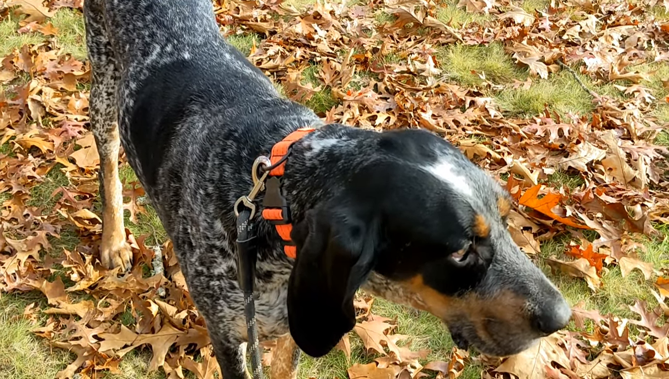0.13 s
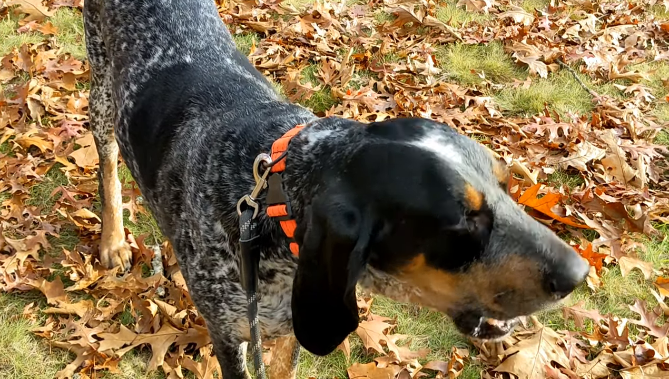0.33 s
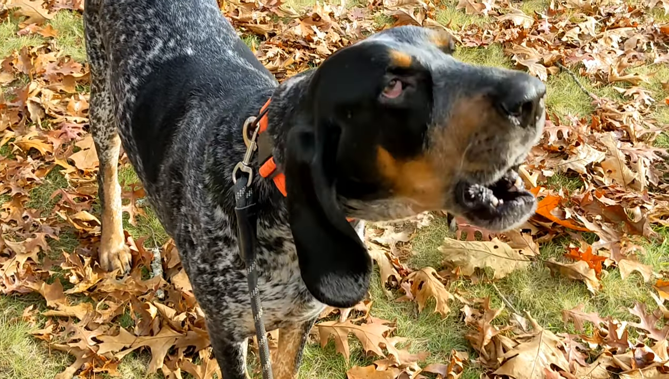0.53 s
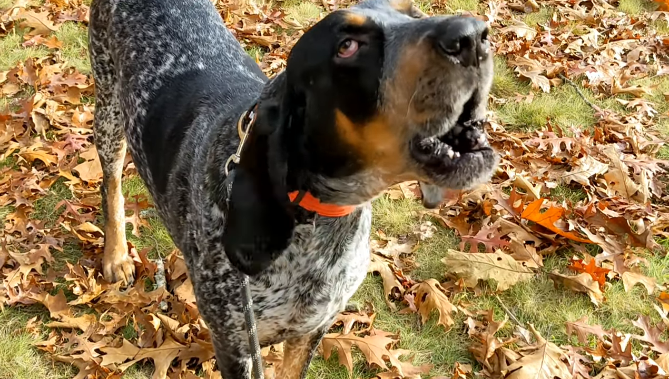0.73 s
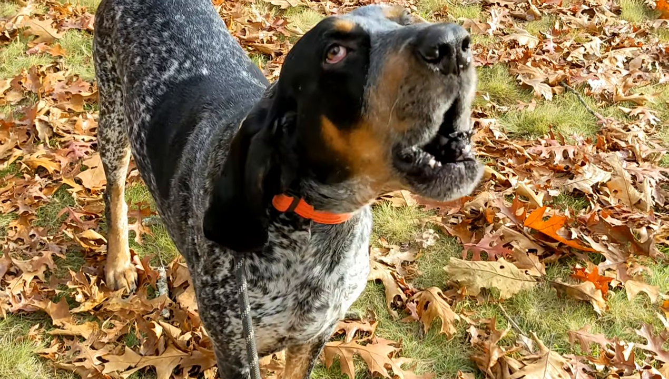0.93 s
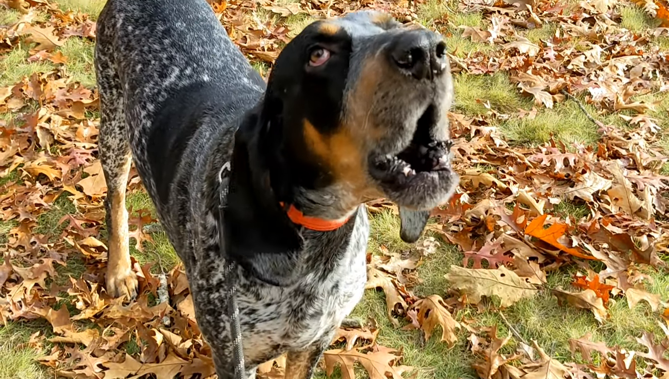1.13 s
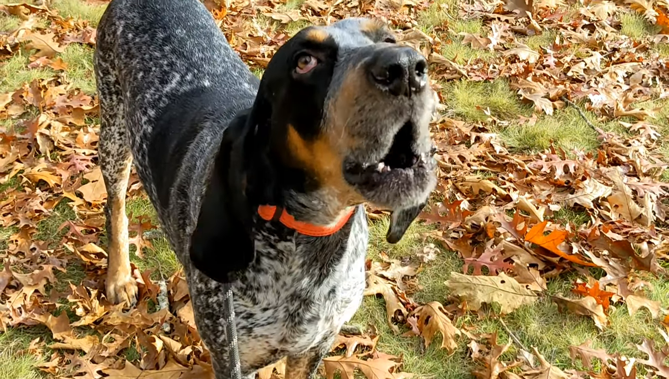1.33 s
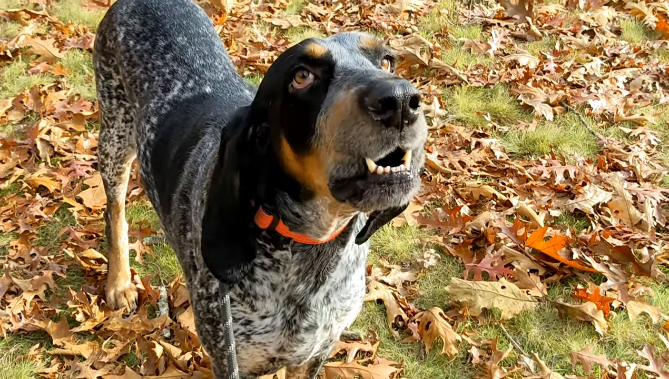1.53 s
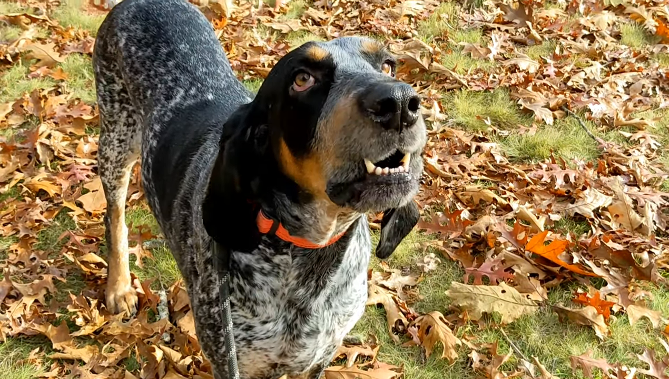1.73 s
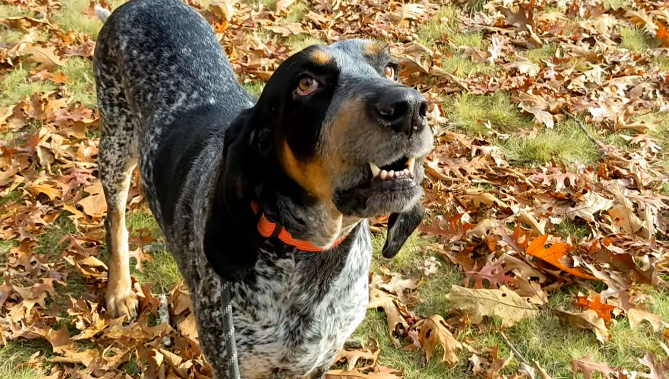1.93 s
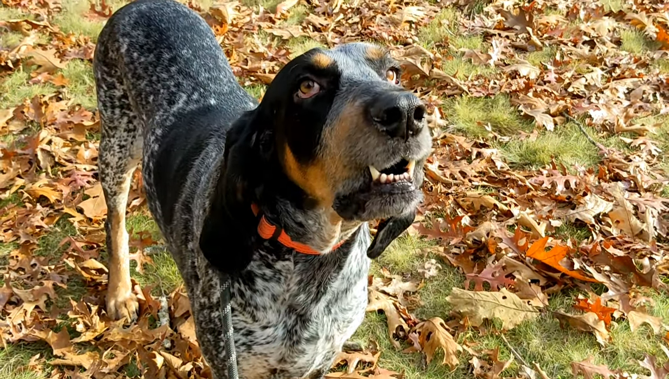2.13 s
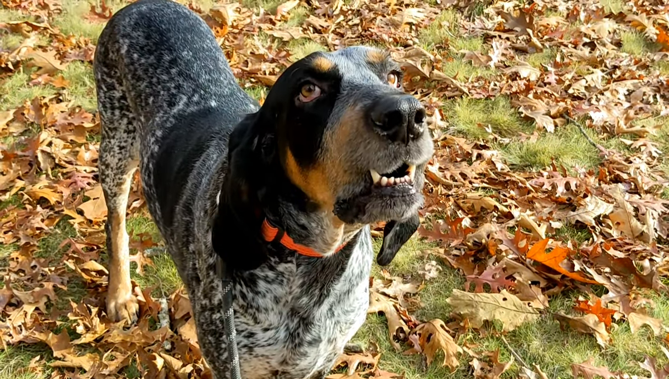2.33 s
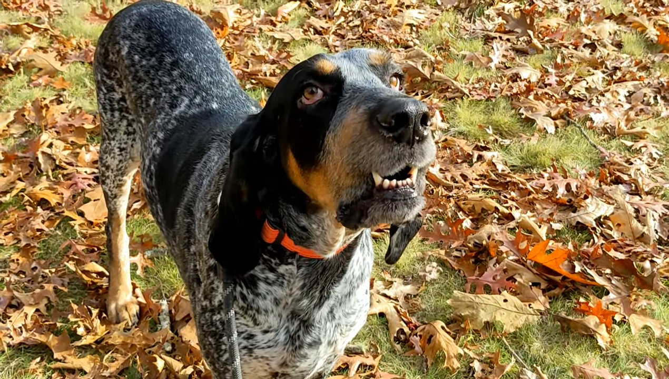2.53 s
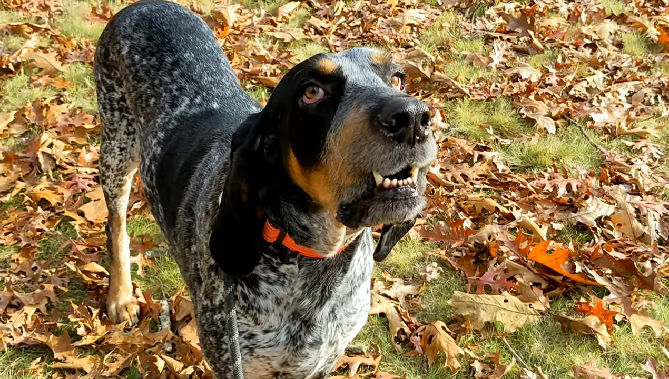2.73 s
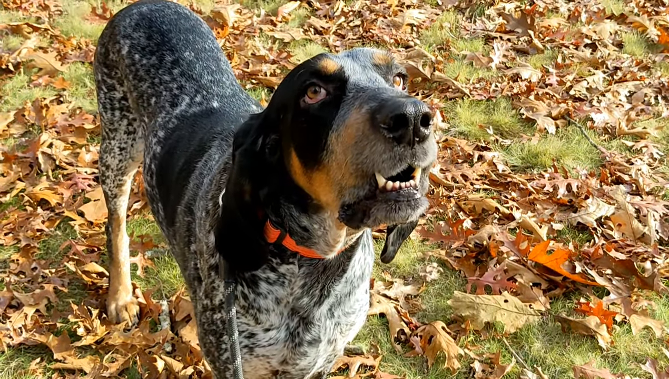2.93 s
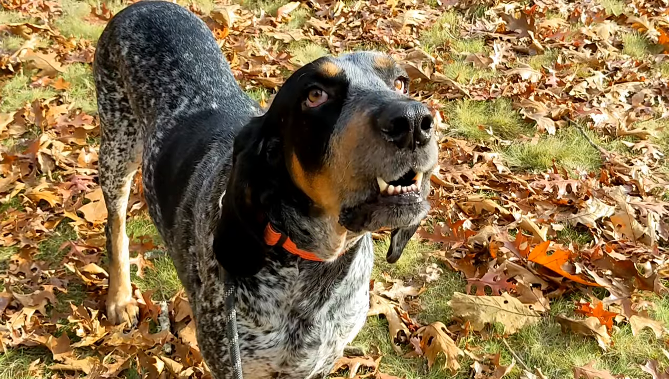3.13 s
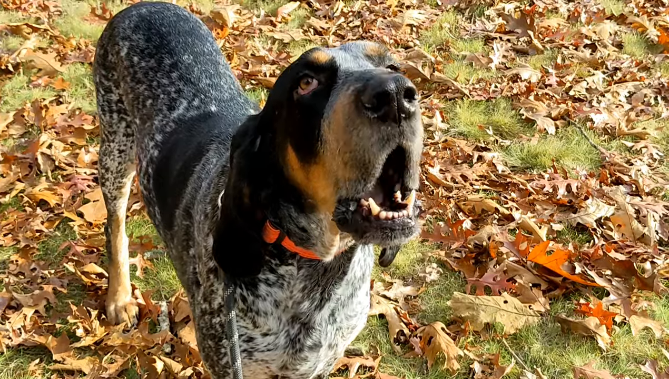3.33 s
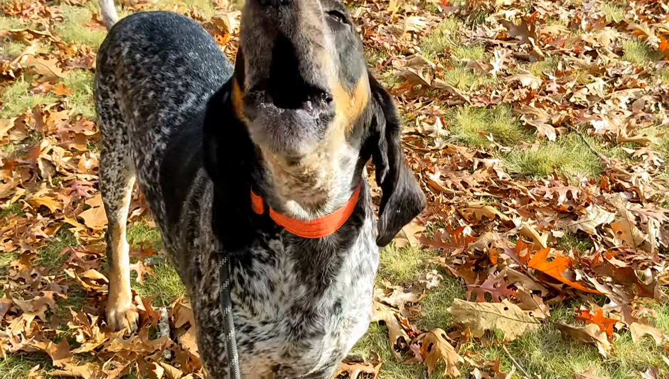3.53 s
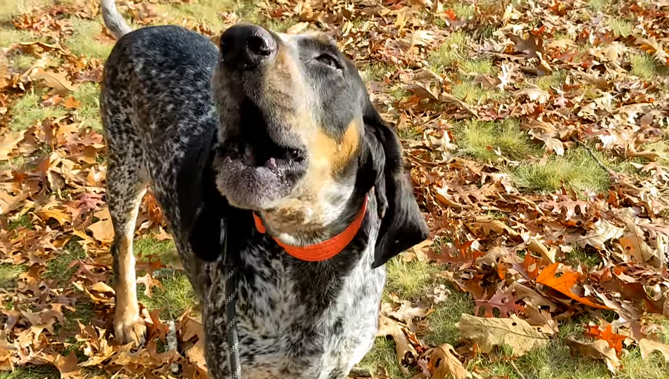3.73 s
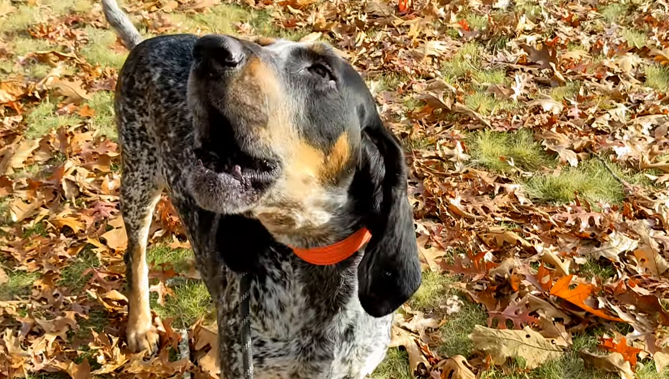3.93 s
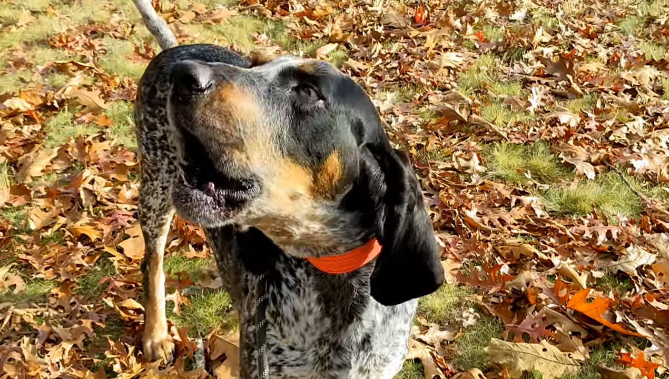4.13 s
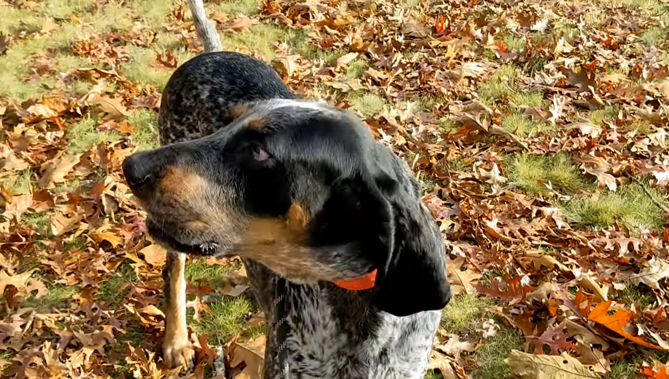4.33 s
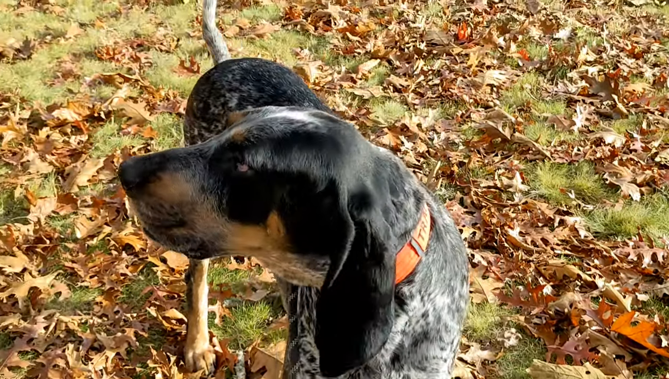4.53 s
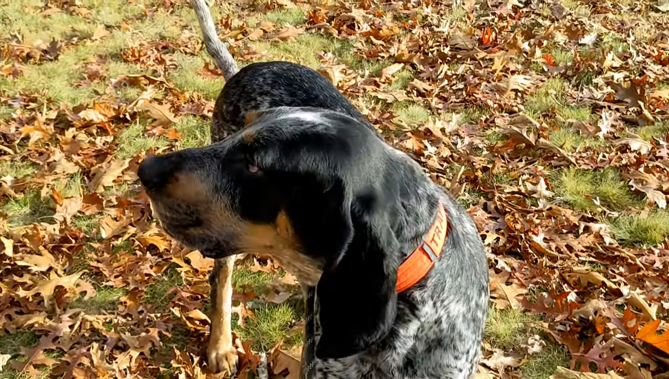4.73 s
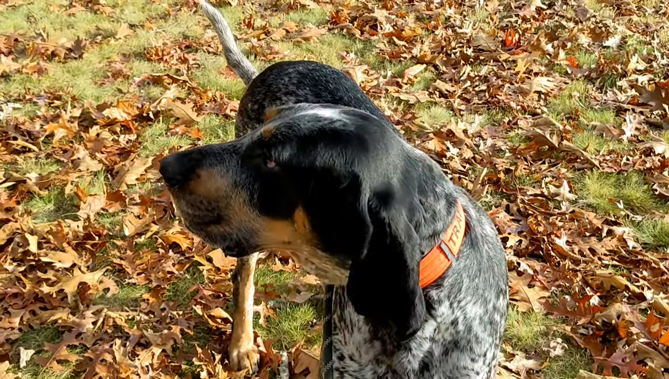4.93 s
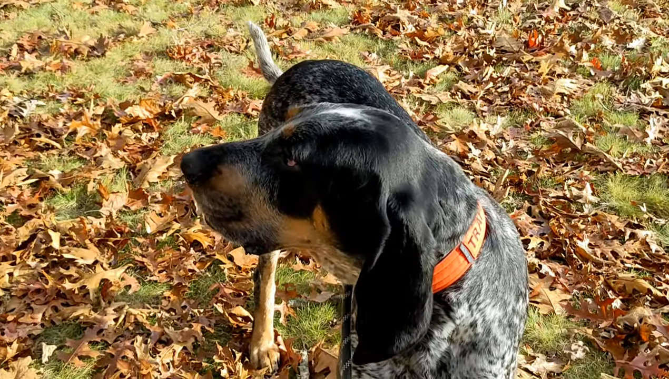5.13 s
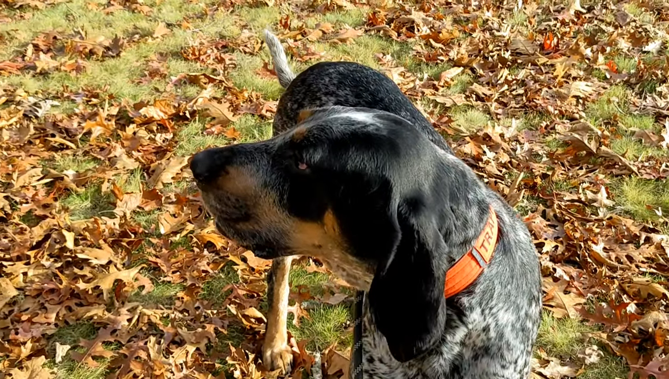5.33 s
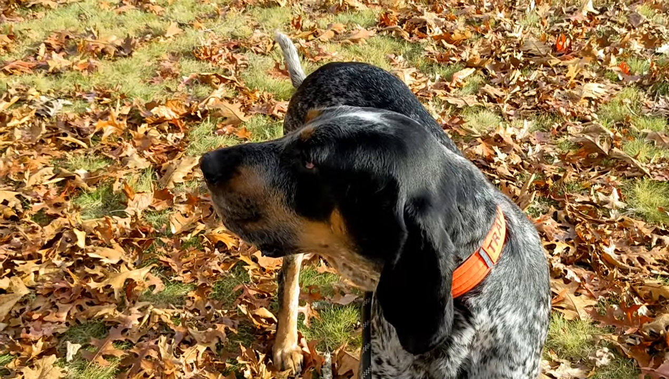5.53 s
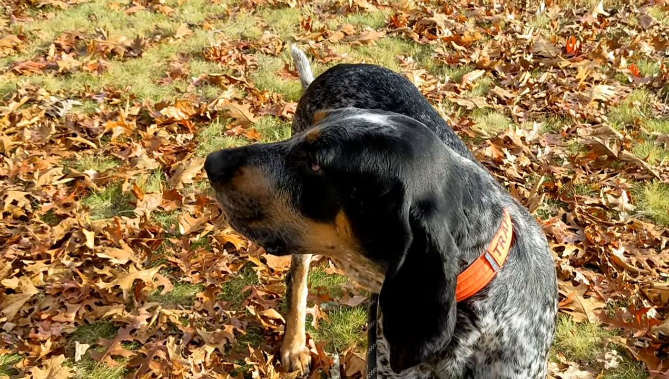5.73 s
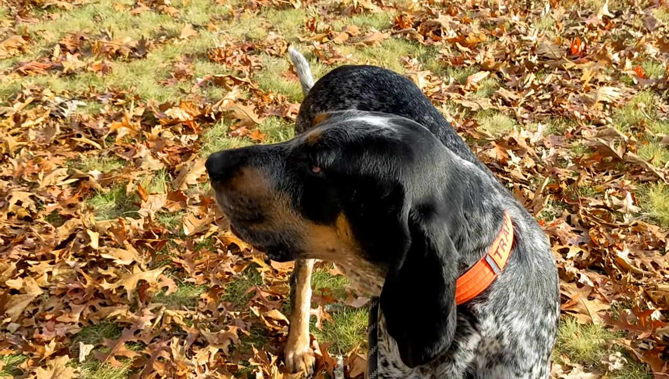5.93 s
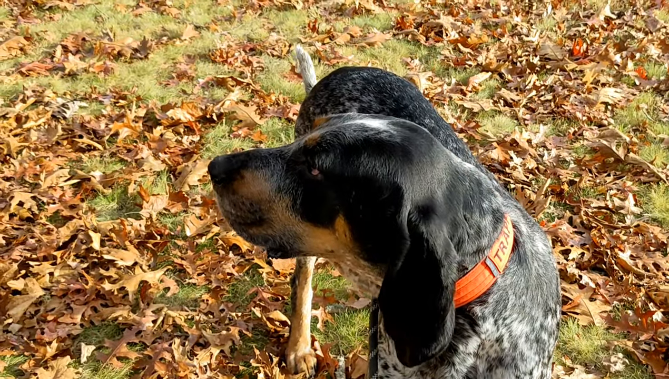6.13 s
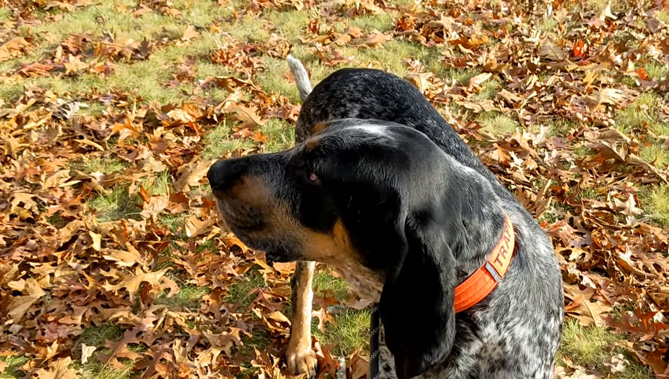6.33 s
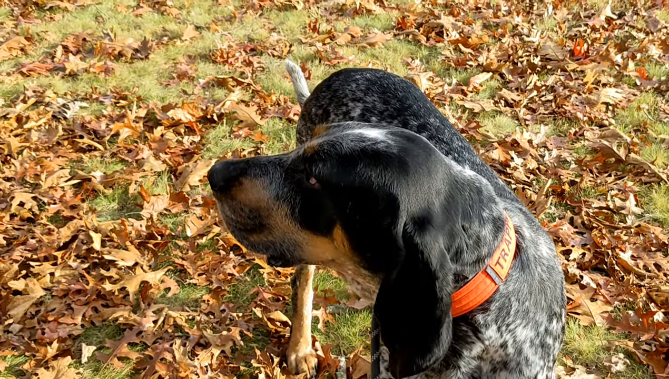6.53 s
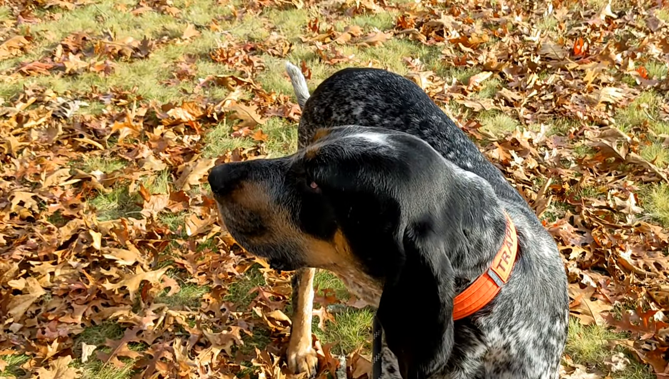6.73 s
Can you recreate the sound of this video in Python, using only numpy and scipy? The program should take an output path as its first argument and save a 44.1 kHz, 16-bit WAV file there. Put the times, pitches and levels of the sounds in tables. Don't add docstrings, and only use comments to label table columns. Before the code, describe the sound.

Two loud, throaty hound bays, each cracking up at the end, separated by faint high whines in a hushed outdoor yard.

```python
import sys
import numpy as np
from scipy import signal
from scipy.fft import rfft, irfft, next_fast_len
from scipy.io import wavfile
from scipy.ndimage import uniform_filter1d, map_coordinates

SR = 44100
rng = np.random.default_rng(int(sys.argv[2]) if len(sys.argv) > 2 else 0)


def waveform_to_disk(signal):
    frames = np.transpose(np.atleast_2d(signal))
    scaled = np.clip(frames, -1, 1) * 32767
    samples = np.round(scaled).astype(np.int16)
    wavfile.write(sys.argv[1], SR, samples)


def gain_from_db(level_db):
    decades = np.asarray(level_db, float) / 20
    return 10 ** decades


N = 299871


def along(points, hz):
    f, v = np.transpose(points)
    return np.interp(np.log(hz + 1), np.log(f + 1), v)


def unit(x):
    return x / np.sqrt(np.mean(x ** 2) + 1e-20)


def wobble(rate_hz, n):
    knots = rng.standard_normal(int(n * rate_hz / SR) + 4)
    return map_coordinates(knots, [np.arange(n) * rate_hz / SR])


def swells(rows):
    t = np.arange(N) / SR
    return sum(db * np.exp(-((t - s) / half_s) ** 2) for s, half_s, db in rows)


def span(rows, fade_s):
    s, *cols = np.transpose(rows)
    t = np.arange(max(round(s[0] * SR), 0), round(s[-1] * SR)) / SR
    window = np.clip(np.minimum(t - s[0] + (s[0] <= 0), s[-1] - t) / fade_s, 0, 1)
    return round(t[0] * SR), window, [np.interp(t, s, c) for c in cols]


def filtered(x, response):
    m = next_fast_len(x.shape[-1] + 8192)
    return irfft(rfft(x, m) * response(np.fft.rfftfreq(m, 1 / SR)), m)[..., :x.shape[-1]]


def resonance(hz, centre_hz, width_hz):
    return -10 * np.log10((1 - (hz / centre_hz) ** 2) ** 2 + (hz * width_hz / centre_hz ** 2) ** 2)


def ports(x, lean, lag_ms):
    side = np.array([[.5], [-.5]])

    def pair(hz):
        return gain_from_db(side * along(lean, hz)) * np.exp(-2j * np.pi * hz * side * lag_ms / 1000)

    return filtered(x, lambda hz: pair(hz) / np.maximum(abs(pair(hz).mean(0)), .5))


def rush(spectrum, patchy_db):
    # hz, left_right_likeness (-1 to 1)
    alike = [(60, 0.96), (150, 0.94), (380, 0.83), (950, 0.01), (2380, -0.1), (5980, -0.023),
             (15000, -0.062)]
    z = signal.stft(rng.standard_normal((2, N + 512)), nperseg=512)[2]
    field = uniform_filter1d(rng.standard_normal(z.shape[1:]), size=6, axis=0)
    field = uniform_filter1d(field, size=14, axis=1)
    pair = signal.istft(z * gain_from_db(patchy_db * unit(field)), nperseg=512)[1][:, :N]

    def mid_side(hz):
        turn = np.arccos(np.clip(along(alike, hz), -1, 1)) / 2
        return gain_from_db(along(spectrum, hz)) * [np.cos(turn), np.sin(turn)]

    mid, side = filtered(pair, mid_side)
    return np.array([mid + side, mid - side]) / np.std(mid)


def whistles():
    # start_s, length_s, from_hz, to_hz, level_db
    strokes = [(0, .095, 2644, 2510, -51), (0.097, .035, 2486, 2250, -64), (.304, .04, 2890, 2420, -50.5),
               (1.501, .055, 4560, 4800, -44), (1.866, .115, 2510, 2350, -61.5),
               (1.98, .075, 2346, 1990, -59.5), (2.338, .125, 2600, 2310, -57.5),
               (2.465, .395, 2298, 2335, -57.5), (2.856, .03, 2292, 2040, -59),
               (2.884, .025, 2040, 2260, -56.5), (3.215, .125, 2614, 2560, -49.5),
               (3.335, .038, 2480, 2620, -44.5), (4.29, .1, 2456, 2576, -54),
               (4.848, .16, 2825, 2380, -53.5), (5.012, .18, 2366, 2295, -62.5),
               (5.433, .22, 2857, 2330, -48.5), (5.644, .085, 2325, 2265, -49.5),
               (5.979, .21, 2870, 2540, -41.5), (6.181, .05, 2540, 2370, -48),
               (6.237, .11, 2410, 2290, -63)]
    # hz, facing_db, turned_db
    overtones = [(5200, -4, -14), (11100, -17, -18.5), (15000, -59, -57)]
    # hz, level_db (per Hz)
    puff = [(200, -23.5), (500, -6), (1470, -11.5), (1570, 1.5), (1670, -5.5), (2500, -8.5), (7000, -16.5),
            (14000, -22)]
    scoop_hz, scoop_s = 327, .014
    slur_s, stroke_fade_db = 0.012, 3
    overtone_grows = 0.89

    hz, gain, air, ended_s = np.full(N, 2400.), np.zeros(N), np.zeros(N), 0
    for s, length_s, from_hz, to_hz, db in strokes:
        t = np.arange(round(length_s * SR)) / SR
        now = slice(round(s * SR), round(s * SR) + len(t))
        lead = slice(now.start - SR // 50, now.start)
        fresh = (s - ended_s > slur_s) * np.exp(-t / scoop_s)
        hz[now] = from_hz + (to_hz - from_hz) * t / length_s - scoop_hz * fresh
        hz[lead] = np.where(fresh[0], hz[now.start], hz[lead])
        hz[now.stop:] = to_hz
        gain[now] = gain_from_db(db - stroke_fade_db * (t / length_s - .5)) * (1 - fresh)
        air[now] = 1
        ended_s = s + length_s
    hz, gain, air = uniform_filter1d([hz, gain, air], size=int(slur_s * SR))
    phase = 2 * np.pi * np.cumsum(hz * (1 + 0.003 * wobble(60, N))) / SR

    turned = np.clip((np.arange(N) / SR - 4.0) / .3, 0, 1)
    at_hz, facing_db, turned_db = np.transpose(overtones)

    def under_db(f):
        return (1 - turned) * np.interp(f, at_hz, facing_db) + turned * np.interp(f, at_hz, turned_db)

    over = sum(gain_from_db(under_db(k * hz) + 3 * wobble(14, N)) * np.sin(k * phase) for k in (2, 4))
    over = over * (abs(gain) / gain_from_db(-48) + 1e-3) ** (overtone_grows - 1)
    tone = np.sqrt(2) * gain * gain_from_db(2.4 * wobble(30, N)) * (np.sin(phase) + over)
    near = ports(tone * (1 - turned), [(2400, -.5), (5000, -2.5)], lag_ms=.03)
    near = near + ports(tone * turned, [(2400, 1.5), (5000, 1)], lag_ms=-.03)
    return gain_from_db(5.5) * near + gain_from_db(-55.5) * air * (1 - 0.13 * turned) * rush(puff, patchy_db=1.5)


def yard(duck_db):
    # hz, level_db (per Hz)
    rumble_spectrum = [(12, -37.5), (20, -13.5), (48, -5.5), (59, 0), (71, -6.5), (81, -10), (90, -9.5),
                       (120, -38.5), (200, -120)]
    hush_spectrum = [(70, -30.5), (125, 1.5), (190, -10), (300, -11), (600, -13), (1000, -12.5),
                     (1800, -17.5), (3500, -16.5), (5400, -24), (7000, -20.5), (9500, -19.5),
                     (12500, -22.5), (15500, -27.5)]
    drone_spectrum = [(88, -120), (90, -30), (103, -9), (109, 0), (116, -9), (140, -26), (145, -120)]
    # start_s (centre), half_s, level_db
    passes = [
        (3, 0.42, 4),
        (6, .25, 4),
        (0.5, .3, 4.5),
    ]
    revs = [
        (2.6, .5, 4),
        (5.15, 0.59, 5.5),
    ]
    gusts = [
        (1.6, .5, 1),
        (3.3, 0.91, 2),
        (6.3, 0.72, 2.5),
    ]
    rumble_db, drone_db, hush_db = -49.5, -54.5, -48 - 2.5
    recover_db, recover_s = -4, 0.22

    breeze_db = -0.07 * wobble(0.96, N) + swells(gusts)
    breeze_db = breeze_db + recover_db * np.exp(-np.arange(N) / SR / recover_s)
    hush = gain_from_db(hush_db + breeze_db) * rush(hush_spectrum, patchy_db=1.16)
    body = filtered(hush, lambda hz: 1 / (1 + (hz / 8000) ** 4))
    drone = gain_from_db(drone_db + swells(revs)) * rush(drone_spectrum, patchy_db=.5)
    rumble = gain_from_db(rumble_db + swells(passes)) * rush(rumble_spectrum, patchy_db=-0.1)
    return rumble + drone + hush - (1 - gain_from_db(duck_db)) * body


def bay(registers, throat, hiss_db, rasp_db, chest_hz):
    # centre_hz, width_hz, level_db
    windpipe = [(367, 30, 0.5), (487.6, 31, 4.5), (884, 150, -8), (1740, 330, -19)]
    # hz, level_db
    mouth = [(1100, -26.5), (1250, -39), (1500, -26), (1720, -37), (1880, -44), (2000, -59.5),
             (2200, -79.5)]
    # start_s, level_db
    breaks = [
        (.426, 10.5),
        (0.596, -7.5),
        (1.436, 0),
        (3.475, -7),
        (4.302, -8.5),
    ]
    throat_width_hz, mouth_width_hz = 65.3, 273
    upper_follows = 0.38
    close_s, close_to = .09, 0.4

    voice, rasp, buzz, hiss, turn = np.zeros((5, 3 * SR // 2))
    start = round(registers[0][0][0][0] * SR) - SR // 8
    k = np.arange(1, 8)[:, None]
    for rows, (tilt_db, open_db, air_db, swell_db, rough) in registers:
        at, window, (hz, level_db, throat_hz, mouth_hz) = span(rows, fade_s=0.0044)
        n, window = len(hz), np.sqrt(window)
        now = slice(at - start, at - start + n)
        left_s = np.arange(n)[::-1] / SR
        rough = np.clip(rough, 0, 1) * np.clip(left_s / 0.061, .15, 1)
        turn[now] = turn[now.start] + 2 * np.pi * np.cumsum(hz) / SR
        phase = turn[now] + .7 * rough * wobble(110, n) + .012 * wobble(60, n)

        low_hz = k[:4] * hz
        low_db = tilt_db * np.log2(k[:4]) + resonance(low_hz, throat_hz, throat_width_hz)
        low_db = low_db + 2 * resonance(low_hz, mouth_hz, mouth_width_hz)
        low_db = low_db + level_db - 10 * np.log10((gain_from_db(low_db) ** 2).sum(0))
        effort = gain_from_db(level_db)
        swell = swell_db * np.arange(n) / SR
        swell = np.where(swell > 0, swell * np.clip(left_s / close_s, close_to, 1), swell)
        size = gain_from_db(along(mouth, k * hz) + open_db + upper_follows * swell) * effort
        size[:4] = gain_from_db(low_db)

        rise_db = uniform_filter1d(low_db[1] - low_db[0], size=900)
        twist = .3 + 2.7 * np.clip((rise_db - 3) / 5, 0, 1)
        lag = twist * np.minimum(k * (k - 1) / 2, 3)
        stack = np.sqrt(2) * (size * np.cos(k * phase - lag)).sum(0)
        voice[now] += window * stack * (1 + .3 * rough * wobble(120, n))

        halves = np.cos(phase * 3 / 2) + .6 * np.cos(phase * 5 / 2) + .4 * np.cos(phase * 7 / 2)
        halves = wobble(34, n) * halves
        grit = (.6 * rough + .008) * rng.standard_normal(n)
        rasp[now] += window * effort * (grit + .15 * rough * halves)

        bright = window * effort * gain_from_db(air_db + swell)
        top = int(9000 / hz.max()) + .5
        snap = top * np.sinc(top * (phase / np.pi % 2 - 1)) / np.sinc(phase / (2 * np.pi) % 1 - .5)
        buzz[now] += bright * unit(snap)
        jet = gain_from_db(1.8 * wobble(26, n)) * (1 + .7 * np.cos(phase))
        hiss[now] += bright * jet * rng.standard_normal(n)
    for s, db in breaks:
        if 0 < s * SR - start < len(rasp):
            rasp[round(s * SR) - start] += gain_from_db(db + 4)

    def pipe(f):
        total = 0
        for j, (c, w, db) in enumerate(windpipe):
            total = total + (-1) ** j * gain_from_db(db) * 1j * f * w / (c * c - f * f + 1j * f * w)
        return total / (1 + (260 / (f + 1)) ** 4) / (1 + (f / 1800) ** 12)

    def chest(f):
        return 1 / (1 + (chest_hz / (f + 1)) ** 8)

    def tract(f):
        return np.sqrt(sum(gain_from_db(2 * db) / (1 + (2 * (f - c) / w) ** 4) for c, w, db in throat))

    def spread(f):
        return np.exp(-1j * (f / 900) ** 1.5)

    def clear(f):
        return 1 / (1 + (f / 6600) ** 5)

    upper = filtered(buzz, lambda f: gain_from_db(6.5) * tract(f) * spread(f) * clear(f))
    breathy = filtered(hiss, lambda f: gain_from_db(hiss_db) * tract(f) * (1 - .76 * clear(f)))
    call = filtered(voice, chest) + gain_from_db(rasp_db) * filtered(rasp, pipe) + upper + breathy
    return np.pad(call, (start, N - start - len(call)))


def first_bay():
    # start_s, pitch_hz, level_db, throat_hz, mouth_hz
    onset = [(0.372, 659.6, -45, 600.0, 1660.0), (0.392, 601, -17, 595, 1600),
             (0.414, 559, -10, 620.0, 1510), (0.428, 548, -15.0, 674, 1340.0)]
    climb = [(0.424, 265.6, -14, 360.0, 936), (0.458, 279.6, -9.5, 393, 860.0),
             (0.502, 315.7, -10.0, 397, 854), (0.51, 319, -11, 397, 860.0)]
    chest_voice = [(0.506, 335, -8.5, 380.0, 940.0), (0.525, 341.5, -8.0, 389, 820.0),
                   (0.612, 317, -9.0, 374, 765), (0.682, 300.8, -8, 379, 897), (0.712, 284, -9, 427, 940.0)]
    hold = [(.708, 272.8, -10.5, 497, 802), (.728, 263.2, -7.5, 484, 810), (.768, 252.1, -8, 488, 857),
            (.902, 249, -8, 479, 866.7), (1.146, 246.6, -8, 469, 904), (1.333, 246.8, -7.5, 502, 1004),
            (1.379, 242.7, -8, 526, 922), (1.42, 232.5, -9, 517, 764), (1.442, 226.2, -9, 465, 745)]
    yelp = [(1.432, 361.4, -16, 548, 1600), (1.45, 380, -6.5, 509, 1410), (1.474, 363.6, -10, 540, 1449),
            (1.502, 354.7, -13.5, 522, 1230), (1.54, 260, -57.5, 456, 1210)]
    # tilt_db (per octave), upper_partials_db, air_db (re level), air_swell_db (per s), rough (0-1)
    folds = [
        (-5.5, 3, -33, 0.5, .035),
        (0.5, 1, -39, 0.1, .047),
        (-7.5, -6, -40, 14, 0.06),
        (-9.5, -5.5, -38, 15.5, 0.01),
        (-10, 10.5, -38, 8.5, 0),
    ]
    # centre_hz, width_hz, level_db
    facing = [(2250, 120, -9.5), (2920, 360, -4), (3785, 290, -6), (4360, 274, 2.5), (5300, 420, -7.5),
              (6920, 570, -9), (8570, 310, -16), (10470, 1100, -21), (12800, 3000, -29.5)]
    registers = [*zip([onset, climb, chest_voice, hold, yelp], folds)]
    return bay(registers, facing, hiss_db=14.0, rasp_db=22.5, chest_hz=181)


def second_bay():
    # start_s, pitch_hz, level_db, throat_hz, mouth_hz
    onset = [(3.39, 657.6, -28, 636, 1750), (3.406, 641.4, -10.5, 620, 1720),
             (3.428, 561.4, -14.5, 787, 1690), (3.462, 426.2, -5.5, 526, 1540),
             (3.5, 399.4, -11.5, 570, 1480)]
    growl = [(3.468, 206.5, -25, 400, 900), (3.498, 268.4, -10, 418, 885), (3.53, 318.7, -10.5, 400, 860),
             (3.56, 312.3, -12, 406, 827), (3.682, 295.9, -10.5, 393, 812), (3.742, 257.7, -10, 417, 860)]
    hold = [(3.738, 255.5, -8.5, 470.6, 1250), (3.842, 247.8, -8, 455.6, 1253),
            (3.912, 245.2, -7.5, 465, 1188), (4.12, 247.5, -8, 460, 1150), (4.202, 241.8, -7, 523, 920),
            (4.256, 229.2, -7.5, 516, 783), (4.288, 206, -15.5, 442.5, 860), (4.305, 217, -20.5, 406, 860)]
    yelp = [(4.295, 369, -14, 538, 1310), (4.333, 327.6, -19, 548, 1178), (4.371, 237.7, -36.5, 350, 1050),
            (4.395, 223, -56.5, 360, 1050)]
    # tilt_db (per octave), upper_partials_db, air_db (re level), air_swell_db (per s), rough (0-1)
    folds = [
        (-9, 1, -26.5, -250, .03),
        (0.4, 3, -30, -43.5, 0.52),
        (-5.5, -3.5, -44, 22.5, .035),
        (-9.5, 4, -40.5, 149.5, 0.032),
    ]
    # centre_hz, width_hz, level_db
    turned = [(2770, 630, -1), (3920, 210, -2.5), (4360, 270, -5), (5060, 500, -7.5), (6840, 700, -13),
              (7270, 400, -11.5), (10900, 1800, -24), (13500, 2500, -28.5)]
    registers = [*zip([onset, growl, hold, yelp], folds)]
    return bay(registers, turned, hiss_db=19.0, rasp_db=23.5, chest_hz=139)


def room(x):
    # hz, t60_s
    decay = [(200, 0.67), (1000, 0.56), (5000, .2)]
    hz, t, z = signal.stft(rng.standard_normal((2, SR // 2)), SR, nperseg=256)
    tail = signal.istft(z * gain_from_db(-60 * t / along(decay, hz)[:, None]), SR, nperseg=256)[1]
    late = np.pad(x, (2500, 0))[None]
    return signal.fftconvolve(late, tail / np.linalg.norm(tail[0]), axes=1)[:, :N]


def grunts():
    catches = [
        (2.005, .05, 225, -56),
        (2.888, .022, 290, -54),
        (3.378, .012, 235, -60),
    ]
    out = np.zeros(N)
    for s, length_s, hz, db in catches:
        t = np.arange(round(2 * length_s * SR)) / SR
        phase = 2 * np.pi * hz * t + 1.3 * wobble(110, len(t))
        partials = np.cos(phase) + .9 * np.cos(2 * phase) + .5 * np.cos(3 * phase)
        out[round((s - length_s) * SR):][:len(t)] += gain_from_db(db) * np.hanning(len(t)) * partials
    return out


def scene():
    # hz, left_minus_right_db
    lean = [
        [(60, -3.5), (110, 0), (200, -4), (380, 4.5), (700, -2), (1290, -4.5), (2380, -4.5), (4400, -11.5),
         (8120, -8), (15000, -3.5)],
        [(60, -3), (110, -6), (200, 0), (380, -0.5), (700, 3), (1290, -2.5), (2380, -5.5), (4400, -7),
         (8120, -4.5), (15000, -2.5)],
    ]
    first, second = first_bay(), second_bay()
    both = first + second
    near = ports(first, lean[0], lag_ms=0.21) + ports(second, lean[1], lag_ms=.17)
    loud = np.clip(uniform_filter1d(abs(both), size=2200) / 0.31, 0, 1)
    return near + gain_from_db(-42.0) * room(both) + whistles() + grunts() + yard(duck_db=-4.5 * loud)


def top_cut(x):
    return signal.sosfilt(signal.butter(12, 16480, fs=SR, output="sos"), x)


def record(dry):
    top_hz = 15760
    held = dry / (1 + abs(dry / .97) ** 8) ** (1 / 8)
    mix = filtered(held, lambda hz: (hz < top_hz) / (1 + (hz / 16200) ** 8))
    return top_cut(mix)


dry = scene()
out = record(dry)
waveform_to_disk(out)
```